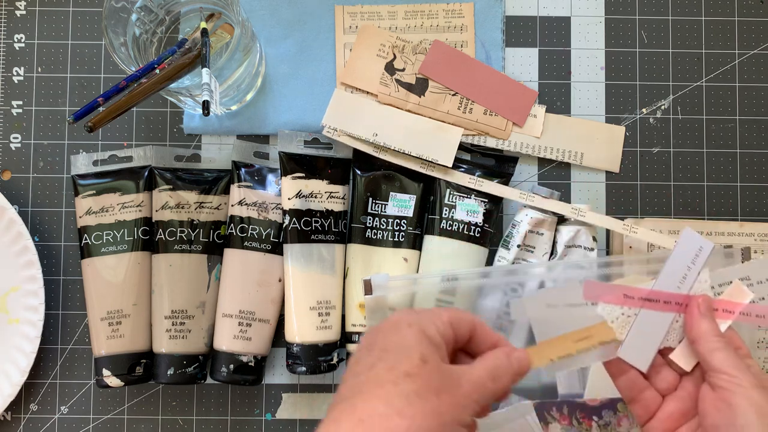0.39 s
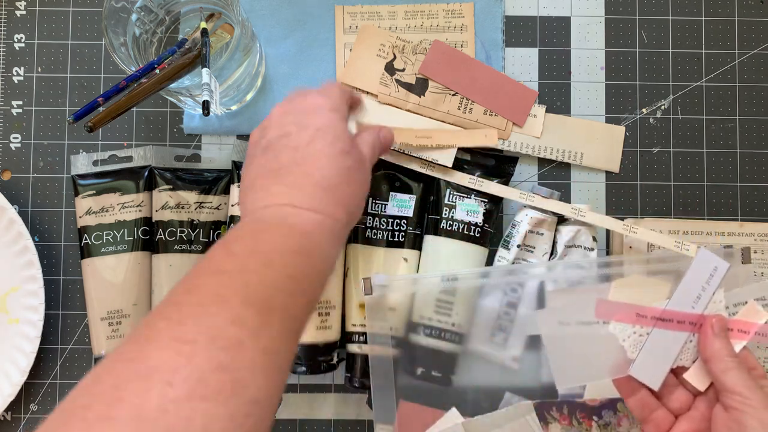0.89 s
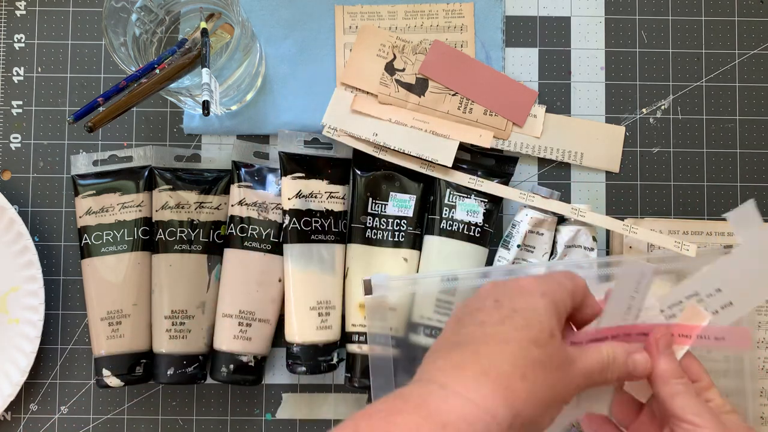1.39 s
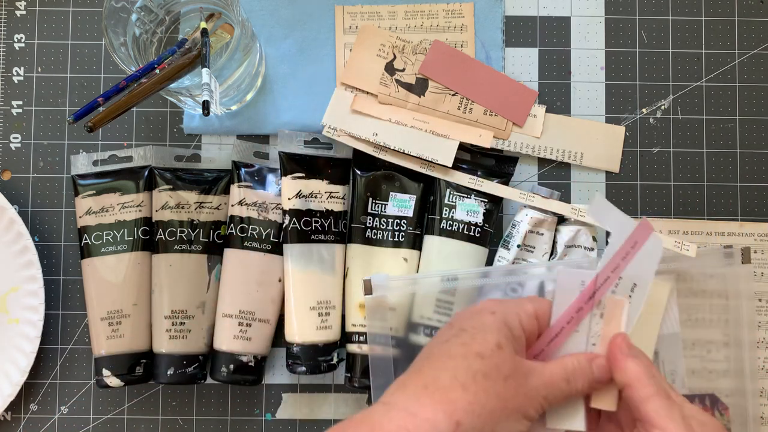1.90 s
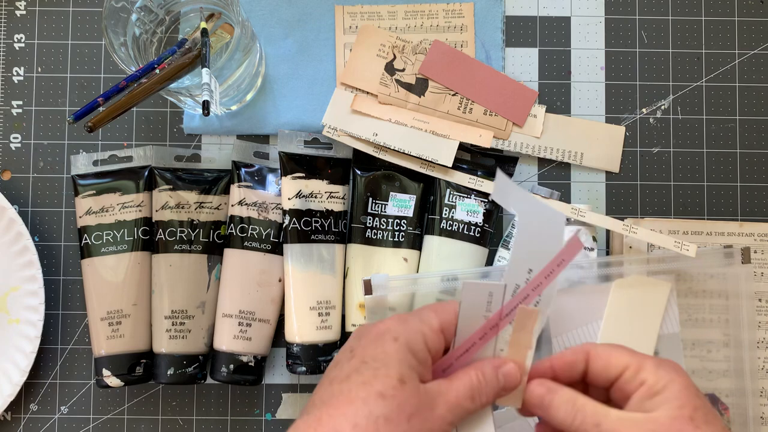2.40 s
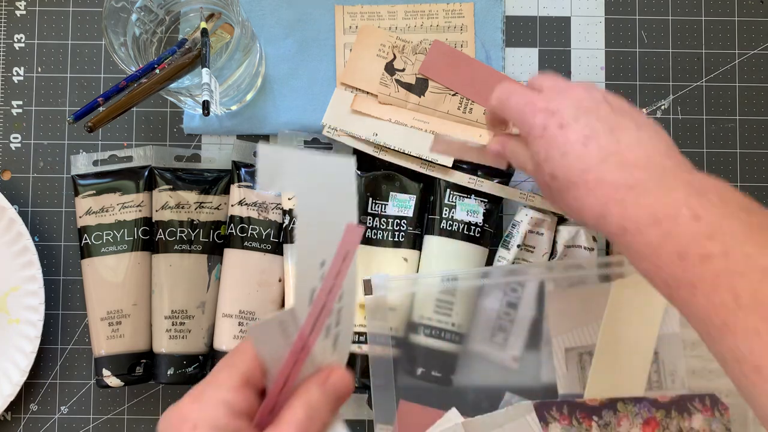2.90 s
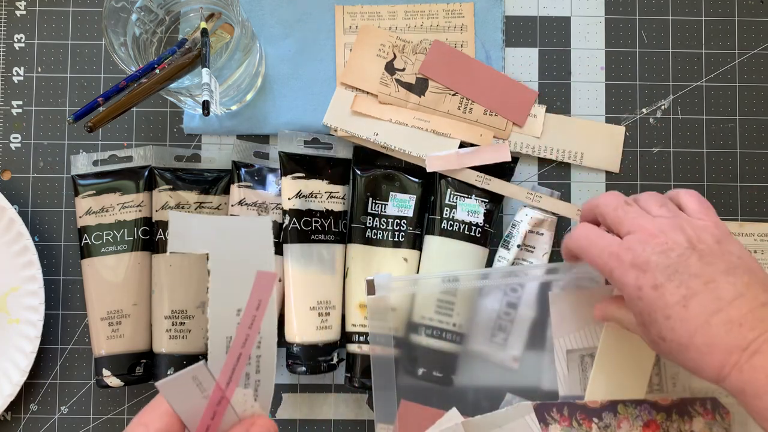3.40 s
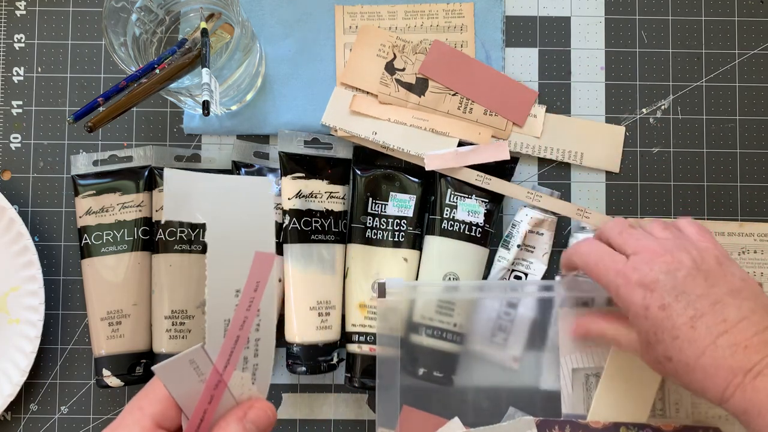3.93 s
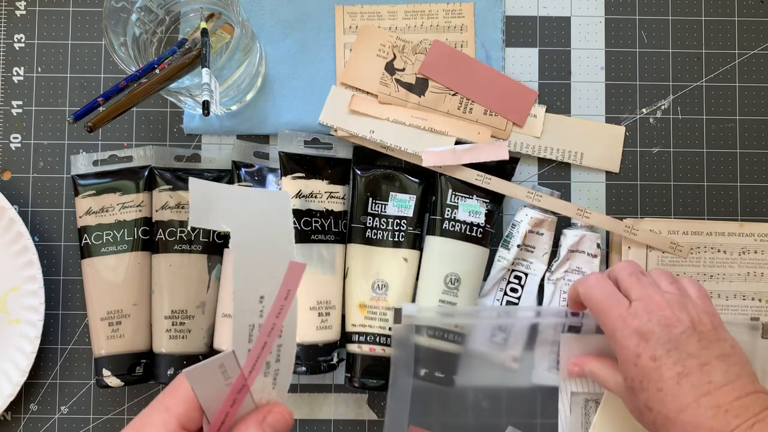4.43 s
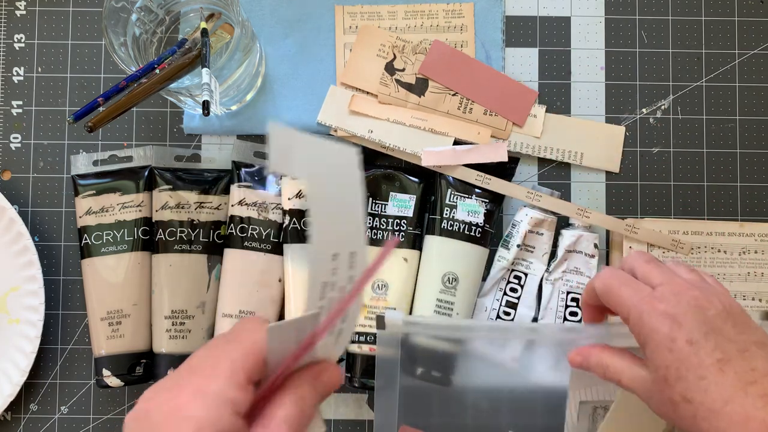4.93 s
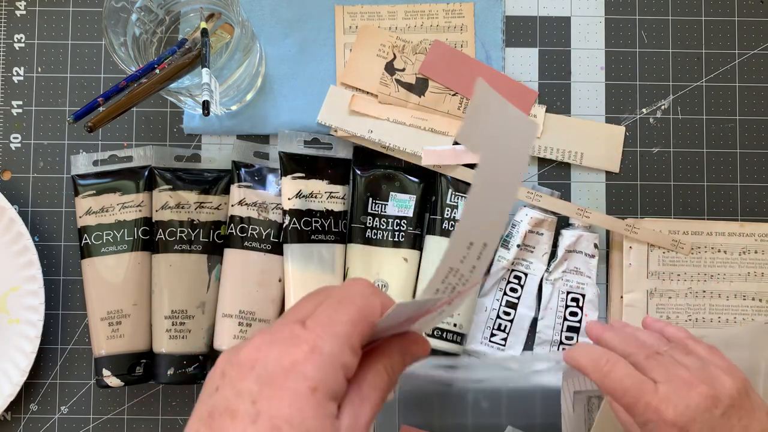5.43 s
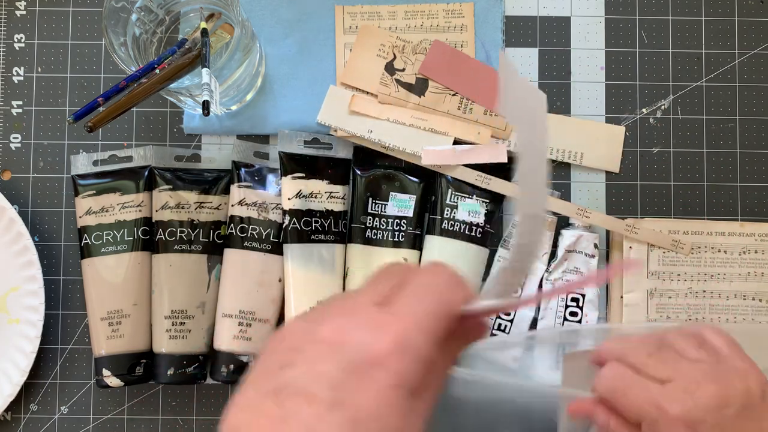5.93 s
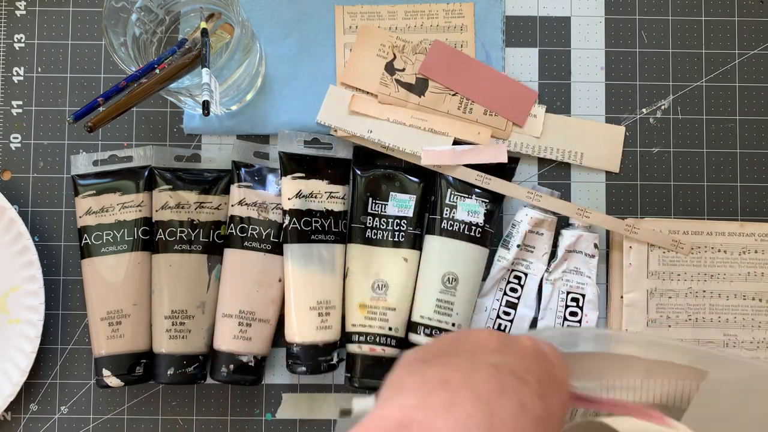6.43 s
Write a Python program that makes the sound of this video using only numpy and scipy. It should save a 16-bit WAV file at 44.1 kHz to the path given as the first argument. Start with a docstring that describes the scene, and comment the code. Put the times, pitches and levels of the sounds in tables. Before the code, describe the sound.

Close in a small, dry room, hands sort paper scraps. Soft slides and small ticks come first, then a bright crackly snap around one and a half seconds and another at two and a half. Later a stiff plastic pouch scuffs, clicks and pops hollowly, ending with a strong knock. Low stand bumps and faint hum lie underneath.

```python
"""A craft table in a small room, under a phone on a stand: hands sort paper scraps and a stiff plastic pouch.
Sliding strips hiss and scuff as shaped noise; creases snap as noise bursts that ring sheet and pouch. The pouch
drums in hollow sine notes; arm movements shake table and stand with low jolts and tremble. A small room answers
the hits with decaying noise over a low household hum, itself filtered noise. Left and right turn against each
other in phase, band by band."""
import sys
import numpy as np
from scipy import signal
from scipy.fft import rfft, irfft, next_fast_len
from scipy.io import wavfile
from scipy.ndimage import uniform_filter1d, map_coordinates

SR = 44100
rng = np.random.default_rng(int(sys.argv[2]) if len(sys.argv) > 2 else 0)


def how_loud(loudness_db):
    """Turn decibels into a plain amplitude multiplier (0 dB gives 1, 20 dB gives 10)."""
    steps = np.asarray(loudness_db, float) / 20
    return 10 ** steps


def put_to_file(sound):
    """Save the sound as 16-bit audio at rate SR, in the file named by the first command-line argument."""
    columns = np.atleast_2d(sound).T  # one column per channel
    safe = np.clip(columns, -1, 1)
    whole_steps = np.round(safe * 32767)
    wavfile.write(sys.argv[1], SR, whole_steps.astype(np.int16))


N = 289737  # length in samples


def unit(x):
    """Scale to rms 1."""
    return x / np.sqrt(np.mean(x ** 2) + 1e-20)


def along(points, hz):
    """Read (Hz, value) points on a log frequency axis."""
    f, v = np.transpose(points)
    return np.interp(np.log(hz + 1), np.log(f + 1), v)


def curve(rows):
    """One value per sample from (s, value) points."""
    s, value = np.transpose(rows)
    return np.interp(np.arange(N) / SR, s, value)


def wobble(rate):
    """A smooth random curve, rate knots a second."""
    knots = rng.standard_normal(int(N * rate / SR) + 4)
    return map_coordinates(knots, [np.arange(N) * rate / SR])


def filtered(x, response):
    """Multiply the spectrum of x by a complex response of frequency."""
    m = next_fast_len(x.shape[-1] + 8192)
    spectrum = rfft(x, m) * response(np.fft.rfftfreq(m, 1 / SR))
    return irfft(spectrum, m)[..., :x.shape[-1]]


def add(track, s, sound):
    """Mix a short sound in at a time in seconds."""
    part = track[max(round(s * SR), 0):][:len(sound)]
    part += sound[:len(part)]


def resonances(modes, f):
    """Causal response of (Hz, width, dB) modes with alternating signs."""
    total = 0
    for k, (center, width, db) in enumerate(modes):
        damping = 1j * f * width
        total = total + (-1) ** k * how_loud(db) * damping / (center * center - f * f + damping)
    return total


def catches(rate, spread_db, t60):
    """The envelope of fibres and tiny creases letting go at random: many faint, a few strong."""
    chance, size = rng.random(N), rng.exponential(size=N)
    kicks = (chance < rate / SR) * how_loud(spread_db * np.minimum(size, 4))
    decay = how_loud(-60 * np.arange(SR // 20) / SR / t60)
    return signal.fftconvolve(kicks, decay)[:N]


def friction(spectrum, grit, patchy_db):
    """Rubbing: two noises of rms 1 together, in patches, under a shared fine-grained envelope."""
    z = signal.stft(rng.standard_normal((2, N)) * grit, nperseg=512)[2]
    field = uniform_filter1d(rng.standard_normal(z.shape[1:]), size=5, axis=0)  # across frequency
    field = uniform_filter1d(field, size=12, axis=1)  # along time
    pair = signal.istft(z * how_loud(patchy_db * unit(field)), nperseg=512)[1][:, :N]
    return unit(filtered(pair, lambda hz: how_loud(along(spectrum, hz))))


def speed_db(rows, level_db, edge_db):
    """Each stroke swells to its level and dies away; overlapping strokes add."""
    t, total = np.arange(0, N / SR + .01, .002), 1e-6
    for (s, rise, fall, *_), db in zip(rows, level_db):
        away = np.where(t < s, (s - t) / max(rise, .01), (t - s) / max(fall, .01))
        total = total + how_loud(db - edge_db * away ** 0.91)  # 0.91 sharpens the peak slightly and eases the far slopes
    return np.interp(np.arange(N) / SR, t, 20 * np.log10(total))


# main paper hiss spectrum, before scaling: freq_hz [Hz], level_db [dB]
HISS_SPECTRUM = [(3000, -120), (5500, -20), (7000, -2), (8000, 0), (10600, 0), (11800, -14), (16000, -120)]
# topmost paper hiss spectrum, before scaling: freq_hz [Hz], level_db [dB]
TOP_SPECTRUM = [(7000, -120), (10400, -14), (11600, -2), (13000, -2), (15500, 0), (15900, -30),
                (20000, -120)]
# spectrum of the paper's body, before scaling: freq_hz [Hz], level_db [dB]
SHEET_SPECTRUM = [(800, -120), (2000, -18), (3000, 0), (4500, 1), (6000, -2), (7500, -16), (12000, -120)]
# spectrum of plastic on the mat, before scaling: freq_hz [Hz], level_db [dB]
SCUFF_SPECTRUM = [(100, -120), (300, 4), (600, -2.5), (1100, -4), (1900, -3), (2800, -8.5), (4000, -39),
                  (9000, -120)]
# resonances of the pouch, before scaling: center_hz [Hz], width_hz [Hz], level_db [dB]
POUCH_MODES = [(408, 23, -8.5), (707, 17, -0.5), (782, 36, -17.5), (1090, 61, 13.5), (1373, 50, -11.5),
               (1637, 79, 7.5), (1950, 89, -12), (2084, 40, 0), (2590, 83, -14.5)]
# topmost hiss over the main hiss: time_s [s], offset_db [dB]
TOP_HISS_OFFSET = [(0, -9), (.35, 6), (.6, -1), (1, 2.5), (1.3, -7.5), (1.8, -6), (2.3, -13), (2.6, -4.5),
                   (3.2, 3.5), (3.45, -10), (6.57, -1)]
# sliding strokes, before overlaps add:
# fastest_s [s], rise_s [s, at least 0.01], fall_s [s, at least 0.01], hiss_db [dB], scuff_db [dB]
SLIDING_STROKES = [(.005, 0.027, 0.035, -71, -73), (.08, 0.095, 0.043, -79.5, -76),
                   (0.289, 0.014, 0.9, -70, -71), (.5, 0.28, 0.051, -65.5, -71),
                   (0.572, 0.062, 0.026, -47, -72), (0.799, 0.024, 0.51, -85, -71),
                   (0.962, 0.02, 0.026, -53.5, -75), (1.1, 0.29, 0.02, -81, -79),
                   (1.222, 0.018, 0.054, -53.5, -62.5), (1.292, 0.036, .14, -51, -47),
                   (1.47, 0.16, 0.15, -50, -82), (1.537, 0.037, 0.087, -38.5, -42.5),
                   (1.712, 0.047, 0.25, -59, -58), (1.987, 0.15, 0.34, -57, -69),
                   (2.166, 0.053, 0.21, -61, -71.5), (2.355, 0.036, 0.15, -66.5, -68.5),
                   (2.49, 0.059, .05, -84, -66), (2.549, 0.076, 0.084, -44.5, -57),
                   (2.75, 0.098, 0.44, -76.5, -63), (2.94, 0.35, 0.15, -90, -67),
                   (3.2, 0.043, 0.01, -70.5, -75), (3.288, 0.075, 0.081, -61.5, -56),
                   (3.371, 0.018, 0.22, -71.5, -54.5), (3.497, .05, 0.043, -73, -69),
                   (3.612, 0.11, 0.23, -79.5, -68), (3.762, 0.031, 0.027, -52.5, -52.5),
                   (3.866, 0.073, 0.19, -64.5, -54.5), (3.977, 0.024, 0.12, -52, -46.5),
                   (4.2, 0.12, 0.054, -68.5, -64), (4.269, 0.033, 0.1, -54.5, -48.5),
                   (4.376, 0.066, 0.072, -51, -43), (4.475, 0.031, 0.069, -56, -43.5),
                   (4.613, 0.064, 0.12, -70.5, -49), (4.987, 0.16, 0.14, -58.5, -50),
                   (5.283, 0.067, 0.2, -83, -61.5), (5.378, 0.18, 0.3, -67, -58),
                   (5.63, 0.043, 0.23, -61.5, -56), (5.741, 0.026, 0.046, -59, -49.5),
                   (5.862, 0.15, 0.59, -61, -54.5), (6.076, 0.083, 0.12, -57.5, -49.5),
                   (6.195, 0.044, 0.17, -43, -49), (6.279, 0.14, 0.23, -46, -50.5),
                   (6.517, 0.028, 0.18, -59, -41)]


def strokes():
    """Paper on paper hisses high, plastic on the mat scuffs low; every catch sounds in all bands at once."""
    *_, hiss_peaks, scuff_peaks = np.transpose(SLIDING_STROKES)
    # dB lost one rise before or one fall after the peak
    hiss_db = speed_db(SLIDING_STROKES, hiss_peaks, edge_db=26)
    scuff_db = speed_db(SLIDING_STROKES, scuff_peaks, edge_db=20.5)
    hiss_share = 0.49  # the paper's body lies between hiss and scuff
    sheet_db = hiss_share * hiss_db + (1 - hiss_share) * scuff_db
    crackle = catches(rate=110, spread_db=4, t60=0.016)
    flutter = how_loud(1.5 * wobble(30))

    hiss = friction(HISS_SPECTRUM, flutter * (1 + 0.27 * crackle), patchy_db=3.0)
    top = friction(TOP_SPECTRUM, flutter * (1 + 0.12 * crackle), patchy_db=2.2)
    sheet = friction(SHEET_SPECTRUM, flutter * (1 + 0.5 * crackle), patchy_db=2.5)
    paper = how_loud(hiss_db) * hiss
    paper += how_loud(hiss_db + curve(TOP_HISS_OFFSET)) * top
    paper += how_loud(sheet_db) * sheet

    scuff = friction(SCUFF_SPECTRUM, flutter * (1 + 0.45 * crackle), patchy_db=3.5)
    # the plain scuff plus the pouch ringing with it
    pouch = unit(filtered(scuff, lambda f: 1.52 + resonances(POUCH_MODES, f)))
    return paper + how_loud(scuff_db) * pouch


def tearing(t, life):
    """A sharp first release, then the crease keeps tearing."""
    onset = (1 - np.exp(-t / (0.037 * life))) ** 2
    release = how_loud(-60 * t / (0.21 * life))
    tail = 0.21 * how_loud(-60 * t / (1.57 * life))
    return onset * (release + tail)


def peak(x, db):
    """Scale the largest sample to a level in dB."""
    return how_loud(db) * x / np.abs(x).max()


# creases snapping, peaks of each part before the mix:
# start_s [s], crack_db [dB], body_pitch_hz [Hz], body_db [dB], treble_db [dB]
CREASE_SNAPS = [(0.278, -48.5, 1290, -53.5, -47), (0.535, -44, 1590, -48.5, -50),
                (.79, -60.5, 950, -54, -71.5), (.958, -62, 2200, -49, -46), (1.111, -58, 960, -77, -58),
                (1.229, -41.5, 960, -48, -54), (1.26, -56, 840, -48, -42), (1.268, -46, 1310, -47, -38),
                (1.285, -47, 2700, -53, -37), (1.302, -47, 2870, -43, -48), (1.331, -52, 2730, -29.5, -55),
                (1.343, -42, 2840, -32.5, -55), (1.529, -21.5, 2700, -19.5, -21),
                (1.533, -24, 2800, -45, -12), (1.713, -26.5, 1800, -34.5, -31.5),
                (1.798, -44.5, 2870, -60, -70), (2.355, -50, 1170, -48.5, -54),
                (2.495, -31, 1130, -31, -24.5), (2.515, -50, 2770, -37, -30),
                (2.539, -21.5, 2500, -35, -16.5), (2.593, -53, 1290, -27.5, -41),
                (2.958, -50.5, 2130, -47, -53), (3.302, -65, 2450, -37, -60), (3.365, -36, 1090, -40, -48),
                (3.449, -48, 1110, -56, -52), (3.502, -47.5, 1300, -44.5, -73),
                (3.749, -43, 1390, -44, -51), (3.768, -50, 1090, -43, -44), (3.854, -42, 990, -32, -34.5),
                (3.875, -57, 1090, -35.5, -41), (3.917, -43.5, 1100, -45, -58),
                (3.959, -24.5, 1410, -22.5, -30), (3.982, -29, 2170, -23, -33),
                (4.189, -62, 1460, -52, -43.5), (4.254, -55, 690, -37, -51), (4.24, -62, 1020, -42, -51),
                (4.267, -52, 1200, -48, -58), (4.284, -40, 2910, -35, -42), (4.3, -57, 1500, -39, -60),
                (4.357, -54, 2010, -41, -33), (4.378, -55, 700, -33, -55), (4.389, -50, 770, -23.5, -55),
                (4.39, -58, 1950, -29, -48), (4.461, -29, 1920, -26, -35), (4.514, -46, 1090, -35, -53),
                (4.601, -67, 1870, -23, -52), (4.927, -44.5, 1870, -48, -58),
                (4.975, -61, 1030, -26.5, -43), (4.989, -38.5, 1390, -48, -33),
                (5.279, -61, 1090, -37, -72), (5.319, -65, 950, -35.5, -71), (5.374, -39, 1020, -30.5, -66),
                (5.431, -45.5, 790, -64, -41), (5.857, -58, 1020, -21.5, -62), (6.022, -44, 950, -32, -43),
                (6.065, -58, 1020, -19.5, -54), (6.09, -58, 900, -29.5, -53), (6.115, -48, 1800, -40, -40),
                (6.195, -54, 1110, -55, -28), (6.231, -44, 1490, -26.5, -40),
                (6.279, -25.5, 2670, -28, -38), (6.439, -60, 1020, -27.5, -56),
                (6.505, -55, 1700, -38, -54), (6.512, -28, 1850, -5, -40), (6.516, -45, 1050, -20.5, -48)]


def snaps():
    """A crease lets go: a burst of noise whose treble dies first; its body rings the sheet and the pouch."""
    out, t = np.zeros(N), np.arange(SR // 8) / SR
    for s, crack_db, hz, body_db, treble_db in CREASE_SNAPS:
        noise = rng.standard_normal((3, len(t)))
        life = 0.019 * np.exp(0.083 * rng.normal())  # s, scattered from snap to snap
        # first jump after 1 ms, over the rms of the tearing; the body takes it as a blow
        noise[:, SR // 1000] = 4.56, 4.56, 15

        def treble_response(f):
            return how_loud(along(HISS_SPECTRUM, f)) + 0.54 * how_loud(along(TOP_SPECTRUM, f))

        def body_response(f):
            own_ring = resonances([(hz, 0.36 * hz, 0)], f)
            return 0.23 * how_loud(along(SCUFF_SPECTRUM, f)) + own_ring + 0.22 * resonances(POUCH_MODES, f)

        crack = filtered(noise[0], lambda f: how_loud(along(SHEET_SPECTRUM, f))) * tearing(t, life)
        treble = filtered(noise[1], treble_response) * tearing(t, 0.54 * life)
        body = filtered(noise[2] * tearing(t, 1.85 * life), body_response)
        add(out, s, peak(crack, crack_db) + peak(treble, treble_db) + peak(body, body_db))
    return out


# the pouch wall flexing in or out; level is that of the lowest partial's peak before the mix:
# start_s [s], level_db [dB], pitch_hz [Hz], length_s [s], swell_share [share of the length]
POUCH_FLEXES = [(4.26, -43, 321, 0.052, 0.36), (4.366, -30.5, 263.6, 0.037, 0.43),
                (4.463, -34.5, 217, 0.04, 0.53), (4.526, -48.5, 301, 0.036, .4),
                (4.981, -41, 410, 0.024, .2), (5.276, -51, 192, 0.062, 0.15),
                (5.324, -38.5, 392, 0.018, 0.2), (5.855, -36.5, 266, 0.013, .25),
                (6.025, -35, 292, 0.015, 0.13), (6.068, -27, 377, 0.036, 0.086),
                (6.512, -53, 463, 0.058, 0.074)]


def drums():
    """The air inside the pouch gives each flex a hollow note with weaker overtones."""
    out = np.zeros(N)
    for s, db, hz, length, swell in POUCH_FLEXES:
        t = np.arange(round(length * SR)) / SR
        crest = np.clip(swell, .02, .9) * length
        shape = np.sin(np.pi / 2 * np.interp(t, [0, crest, length], [0, 1, 0])) ** 2.2
        note = np.sin(2 * np.pi * hz * t)
        note += 0.27 * np.sin(2 * np.pi * 1.7 * hz * t)
        note += 0.19 * np.sin(2 * np.pi * 2.5 * hz * t)
        add(out, s, how_loud(db) * shape * note)
    return out


# jolts through the stand, before the left-right wobble: middle_s [s], level_db [dB], pitch_hz [Hz]
STAND_JOLTS = [(0.653, -40, 48.4), (0.71, -39, 76), (1.052, -31.5, 56.5), (1.241, -40, 100), (1.3, -46, 60),
               (2.001, -49, 59.7), (2.388, -47, 91), (2.607, -49, 37), (2.613, -41, 63.7), (2.765, -38, 82),
               (2.84, -37, 59.5), (2.94, -41, 70), (3.098, -40, 45), (3.547, -46, 100.6),
               (3.765, -44, 61.4), (3.919, -27.5, 74), (4.416, -47, 50.6), (4.513, -46.5, 48.3),
               (4.616, -38.5, 63), (4.716, -38.5, 103), (5.223, -45.5, 61), (5.834, -47, 124),
               (6.065, -40.5, 112), (6.073, -53, 37.7)]
# level of the stand's trembling, before its wobble: time_s [s], level_db [dB]
TREMBLE_LEVEL = [(0, -60.5), (.55, -61.5), (.75, -45), (.92, -61.5), (1.02, -44), (1.25, -49.5), (1.4, -55),
                 (2.07, -61.5), (2.55, -51), (2.9, -44.5), (3.25, -53.5), (3.5, -65.5), (3.95, -37),
                 (4.12, -58.5), (4.6, -49), (4.9, -59), (6.57, -55)]
# spectrum of the trembling, before scaling: freq_hz [Hz], level_db [dB]
TREMBLE_SPECTRUM = [(20, -78.5), (35, -13), (55, -5), (85, -9), (120, -12), (170, -20), (260, -48.5),
                    (600, -120)]


def stand():
    """Soft jolts swing the stand for a cycle or two, over a tremble that swells and sinks."""
    out, t = np.zeros(N), np.arange(-SR // 10, SR // 10) / SR
    for s, db, hz in STAND_JOLTS:
        shape = np.exp(-(t * hz / 0.81) ** 2 / 2)  # half length 0.81 swings
        swing = np.cos(2 * np.pi * hz * t + rng.normal(0, 0.67))
        add(out, s + t[0], how_loud(db) * shape * swing)
    noise = rng.standard_normal((2, N))
    tremble = unit(filtered(noise, lambda hz: how_loud(along(TREMBLE_SPECTRUM, hz))))
    jolts = out * how_loud([[1.5], [-1.5]] * wobble(4.7))  # one channel up, the other down, dB
    return jolts + how_loud(curve(TREMBLE_LEVEL) + 0.82 * wobble(4.1)) * tremble


# the room's decay: freq_hz [Hz], t60_s [s]
ROOM_DECAY = [(200, 0.4), (1400, 0.11), (10000, 0.053)]


def room(x):
    """Each frequency of the room's answer dies at its own speed; a fresh tail every third of a second."""
    out, step = np.zeros((2, N + SR)), SR // 3
    for start in range(0, N, step):
        hz, t, z = signal.stft(rng.standard_normal((2, SR // 3)), SR, nperseg=256)
        decay = how_loud(-60 * t / along(ROOM_DECAY, hz)[:, None])
        tail = signal.istft(z * decay, SR, nperseg=256)[1]
        tail = tail / np.linalg.norm(tail[0])
        wet = signal.fftconvolve(x[None, start:start + step], tail, axes=1)
        out[:, start + 120:][:, :wet.shape[1]] += wet  # the answer lags by 120 samples
    return out[:, :N]


# household hum spectrum, before scaling: freq_hz [Hz], level_db [dB]
HUM_SPECTRUM = [(25, -22.5), (60, 0), (95, -23), (120, 8.5), (160, -11.5), (250, -5), (330, -6.5),
                (420, -14), (520, -26), (1000, -32), (2500, -42.5), (6000, -45), (11000, -51), (15400, -41),
                (16200, -87.5)]


def household_hum():
    """A low hum of filtered noise that drifts slowly in level."""
    return how_loud(-57) * friction(HUM_SPECTRUM, how_loud(0.77 * wobble(1.6)), patchy_db=2.0)


def scene():
    """Direct hits are the same in both channels; diffuse sounds differ."""
    hits = snaps() + drums()
    return hits / np.sqrt(2) + how_loud(-13.5) * room(hits) + strokes() + stand() + household_hum()


def roll_off(x):
    """The treble ends steeply here."""
    return signal.sosfilt(signal.butter(12, 16870, fs=SR, output="sos"), x)


# left against right per band, phase lead in steps and likeness: # freq_hz [Hz], left_lead [half turns],
# likeness [0 to 1, left against right]
STEREO_WIDTH = [(0, -.1, .94), (380, -.1, .85), (550, 0, .2), (1000, 0, .3), (1600, .06, .6),
                (2600, .7, .5), (3400, .42, .6), (4350, 1, .97), (5050, 1, .99), (5700, 1.5, .7),
                (6350, 2, .99), (7300, 2, .99), (7850, 2.5, .7), (8500, 3, .99), (9400, 3, .99),
                (9950, 3.5, .7), (10550, 4, .99), (11500, 4, .99), (12050, 4.5, .7), (12650, 5, .99),
                (13700, 5, .99), (14250, 5.5, .7), (14800, 6, .99), (22050, 6, .99)]
# left over right: freq_hz [Hz], lean_db [dB]
SIDE_LEAN = [(130, 0), (300, 2.7), (500, 0), (900, -1), (1200, 0)]


def record(dry):
    """Left and right are blended band by band to set how alike they are, and turned against each other in
    phase."""
    hz_points, half_turns, alike = np.transpose(STEREO_WIDTH)

    def blend(hz):
        return np.arccos(np.clip(np.interp(hz, hz_points, alike), 0, 1)) / 2

    def turn(hz):
        phase = np.exp(.5j * np.pi * np.interp(hz, hz_points, half_turns))
        return phase * how_loud(along(SIDE_LEAN, hz) / 2)  # each side takes half of turn and lean

    common = filtered((dry[0] + dry[1]) / np.sqrt(2), lambda hz: np.cos(blend(hz)))
    apart = filtered((dry[1] - dry[0]) / np.sqrt(2), lambda hz: np.sin(blend(hz)))
    sides = np.array([common + apart, common - apart])
    sides = filtered(sides, lambda hz: np.array([turn(hz), 1 / turn(hz)]))
    # the treble falls away from 15900 Hz to silence at 16800 Hz
    sides = filtered(sides, lambda hz: np.clip((16800 - hz) / 900, 0, 1) ** 4)
    return roll_off(sides)


dry = scene()
out = record(dry)
put_to_file(out)
```